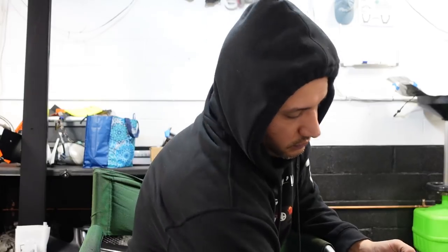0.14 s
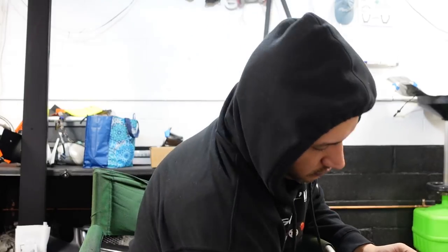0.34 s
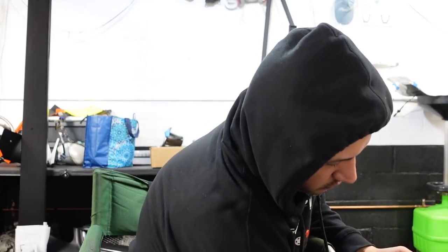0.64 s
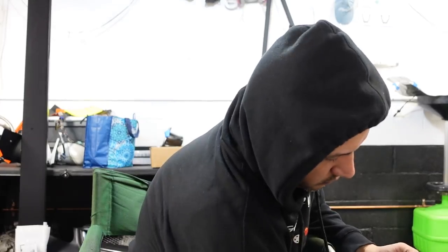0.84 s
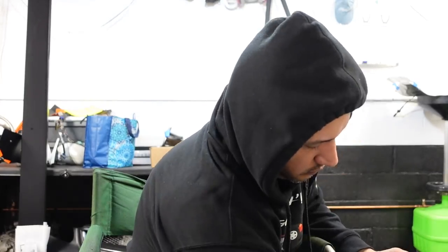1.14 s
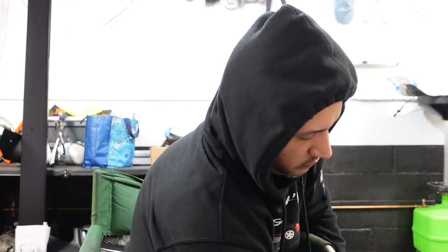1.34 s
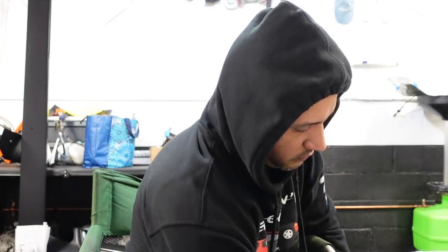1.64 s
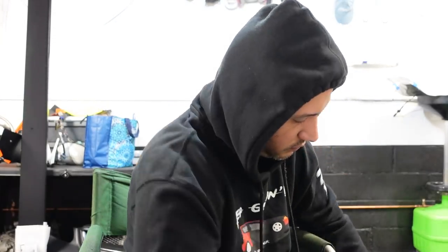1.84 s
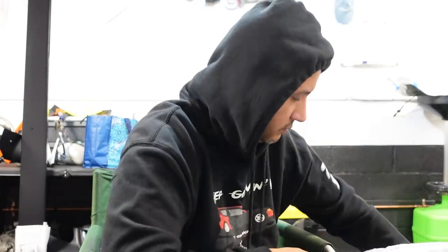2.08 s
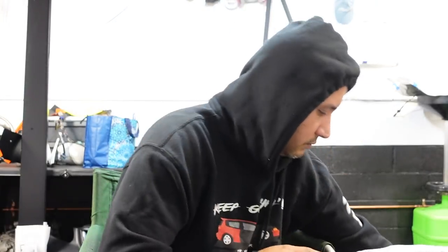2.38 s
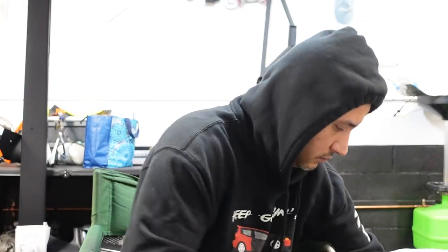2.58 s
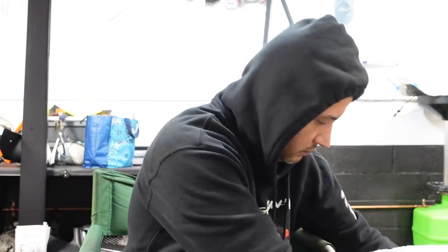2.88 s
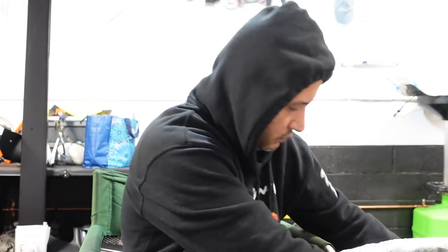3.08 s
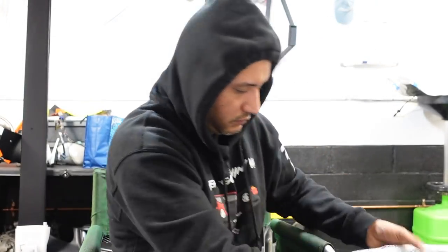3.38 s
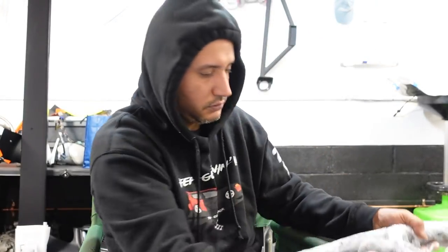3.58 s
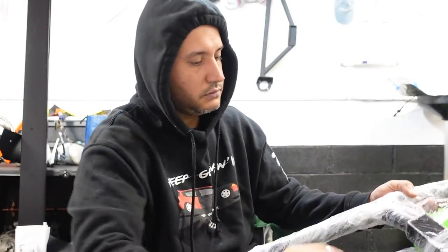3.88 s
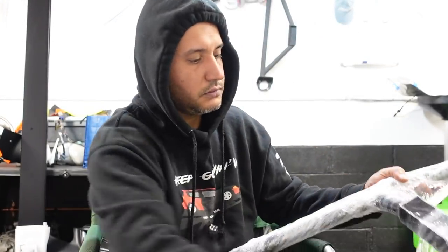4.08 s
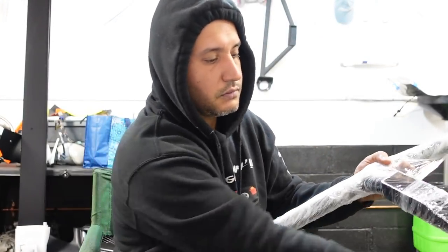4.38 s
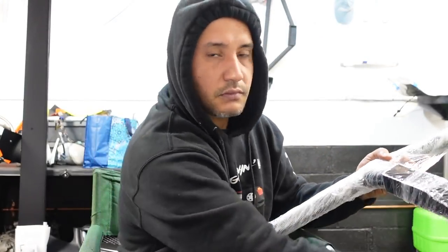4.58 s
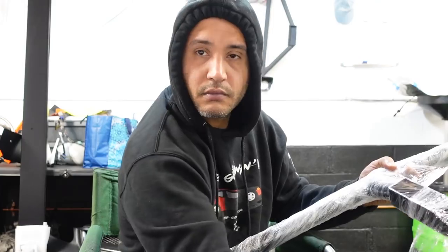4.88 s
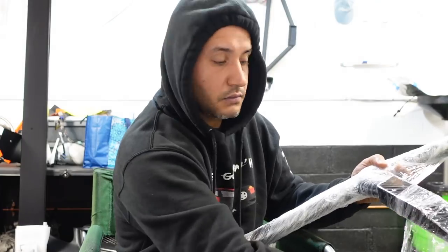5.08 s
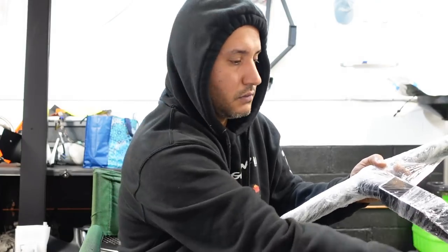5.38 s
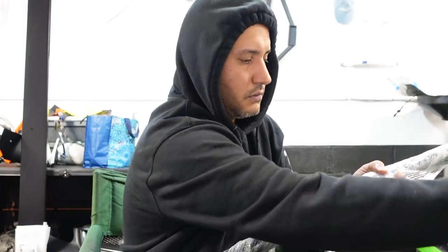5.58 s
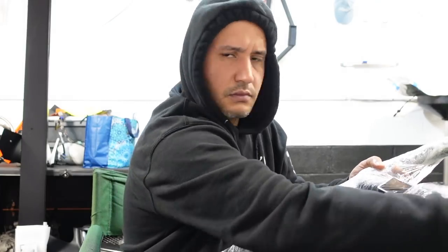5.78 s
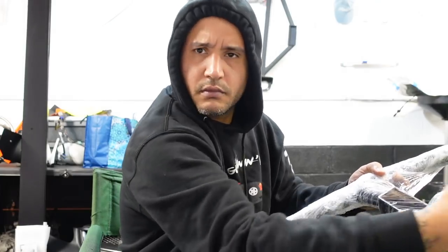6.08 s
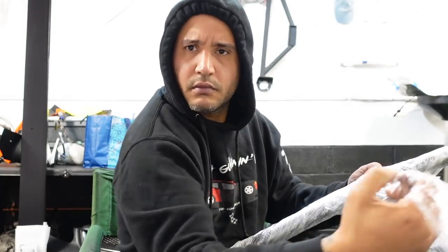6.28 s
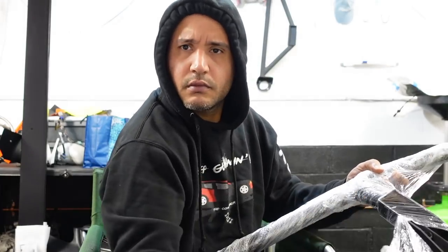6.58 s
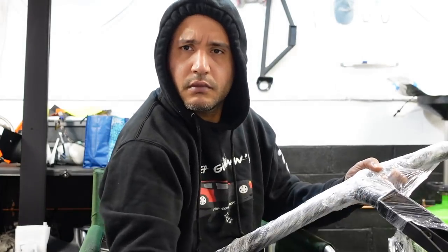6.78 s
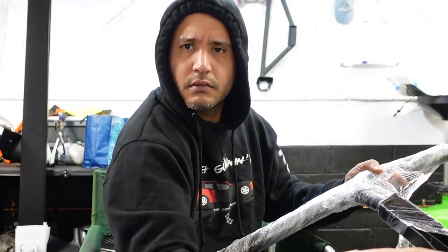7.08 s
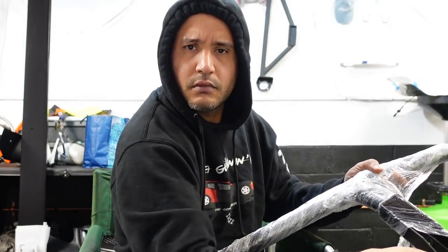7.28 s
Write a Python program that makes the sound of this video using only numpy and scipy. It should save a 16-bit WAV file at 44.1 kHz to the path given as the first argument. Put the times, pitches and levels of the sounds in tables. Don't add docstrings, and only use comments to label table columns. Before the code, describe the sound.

Hands work plastic film wrapped around metal bars, close to a stereo microphone in a hard-walled garage. Crinkling comes in uneven squeezes, quieter at first, with a cluster of snaps and small air-pocket blips just after two seconds. The loudest crackles come around four seconds and again just before six, then it thins to faint rustles and ticks over soft hiss and low hum.

```python
import sys
import numpy as np
from scipy import signal
from scipy.fft import rfft, irfft, next_fast_len
from scipy.io import wavfile
from scipy.ndimage import uniform_filter1d

SR = 44100
rng = np.random.default_rng(int(sys.argv[2]) if len(sys.argv) > 2 else 0)


def nominal_scale(level):
    x = np.asarray(level, float) / 20
    return 10 ** x


def master_out(mix):
    frames = np.transpose(np.atleast_2d(mix))
    ceiling = np.clip(frames, -1, 1)
    pcm = np.round(ceiling * 32767).astype(np.int16)
    wavfile.write(sys.argv[1], SR, pcm)


N = 328236

# (frequency [Hz], level per Hz [dB])
HISS_COLOUR = [(18, -42), (30, -49), (66, 3), (170, 9.5), (252, 7), (355, 0), (584, -1), (822, 0),
               (889, -2), (1070, -4.5), (4910, -2.5), (9970, -31), (16000, -62)]
# (time [s], level [dB])
RUMBLE_LEVEL = [(0.0, -62), (0.23, -63), (0.27, -70), (1.76, -65.5), (1.99, -58), (2.73, -81), (3.52, -69),
                (3.6, -63), (3.83, -66.5), (4.93, -74), (5.06, -62), (5.47, -72), (5.76, -64), (6.65, -72),
                (6.84, -56.5), (7.44, -66)]
# (frequency [Hz], width [Hz])
ROOM_MODES = [(50, 25), (82, 4), (205, 41)]
# (time [s], level [dB])
BENCH_LOAD = [(0, 3.5), (0.5, 3), (1.3, 4.5), (1.7, -2), (2.1, -0.5), (2.4, -6.5), (3.1, -3), (3.55, 8),
              (4.15, 4), (4.35, 1), (5.3, -8), (5.62, 4.5), (5.8, -1), (6.5, 0), (7.44, -3)]
# (peak time [s], effort [dB], rise [s], fall [s], fold size [no unit])
SQUEEZES = [(0.08, -39, 0.47, 0.2, 0.22), (0.248, -33.5, 0.16, 0.097, 0.11),
            (0.688, -27.5, 0.088, 0.13, 0.29), (0.86, -38.5, 0.17, 0.5, 0.7),
            (1.088, -36.5, 0.4, 0.35, -0.17), (1.309, -35.5, 0.11, 0.13, -0.52),
            (1.493, -39, 0.17, 0.19, -0.064), (1.7, -43.5, 0.097, 0.78, -0.71),
            (2.084, -31, 0.53, 0.22, -0.18), (2.161, -31, 0.32, 0.05, 0.93),
            (2.361, -37.5, .14, 0.34, 0.85), (2.614, -39, 0.31, 0.42, 0.2), (2.897, -43.5, 0.1, 1, -0.61),
            (3.25, -32.5, 0.087, 0.11, 0.24), (3.601, -32.5, 0.32, 0.2, 0.41),
            (3.767, -29, 0.18, 0.12, -0.098), (3.967, -33, 0.048, 0.34, .1), (4.061, -33, 0.28, 0.17, 0.25),
            (5.295, -45, 0.08, 0.78, 0.34), (5.671, -29.5, 0.19, 0.22, 0.09), (5.97, -28, 0.4, 0.048, 0.31),
            (6.311, -35, 0.34, 0.12, -0.18), (6.508, -35.5, 0.22, 0.21, -0.34),
            (6.807, -38.5, 0.23, 0.19, 0.24)]
# (time [s], effort [dB], fall [s], fold size [no unit])
TUGS = [(0.589, -45.5, 0.48, 0.74), (0.186, -40, 0.32, .4), (1.237, -43, 0.08, -0.67),
        (3.205, -35, .2, -.2), (3.15, -43.5, .3, -.4), (3.389, -37, 0.42, -.7), (3.462, -28, 0.067, -0.55),
        (3.915, -43, 0.27, -0.53), (4.241, -26.5, 0.26, -0.055), (4.328, -32.5, 0.03, -0.73),
        (4.382, -35.5, 0.2, 0.5), (4.207, -34, 0.21, 0.2), (4.47, -42.5, 0.53, 0.19),
        (4.57, -49.5, 0.45, -0.5), (4.664, -36.5, 0.11, -0.5), (4.75, -47, 0.59, -0.5),
        (4.815, -47.5, 0.36, -0.46), (5.385, -43.5, 0.25, -0.61), (2.97, -45, 0.1, -0.18),
        (4.87, -34, 0.015, -0.12), (5.494, -41, 0.55, .2), (5.804, -25.5, 0.27, .6),
        (6.128, -41.5, 0.72, -0.05), (6.621, -35.5, 0.28, -0.63), (5.215, -53.5, .5, -.3),
        (7.0, -52, 0.74, -0.64), (7.234, -49.5, .2, -1), (7.335, -49.5, 0.39, -1.6)]
# (frequency [Hz], level per Hz [dB])
FILM_COLOUR = [(82, -26), (140, -14), (296, -6.5), (375, -10.5), (690, -8), (747, -6), (808, -7),
               (1150, -4), (1300, -3), (2160, -1), (4850, 2.5), (15500, 22.5)]
FOLD_EDGES = [800, 2000, 5000]
# (delay [s], level [dB], centre frequency [Hz], blur [s])
ECHOES = [(.0073, -7, 6500, .0005), (.0165, -15, 4000, .002), (.027, -16, 4000, .003)]
# (frequency [Hz], time to fall 60 dB [s])
WALL_DECAY = [(200, 0.37), (1000, 0.39), (3000, 0.37), (7000, 0.63), (14000, 0.36)]
# (frequency [Hz], likeness [0 to 1])
LEFT_RIGHT_LIKENESS = [(60, .96), (180, .8), (550, .8), (1650, .87), (3000, .95), (5000, .93), (9000, .8),
                       (15000, .88)]
# (time [s], peak [dB], ring [Hz], flap relative to peak [dB])
LOUD_SNAPS = [(0.6479, -18.4, 2670, -5), (0.6756, -11.5, 3270, -4), (1.0216, -23, 1550, 0),
              (2.0251, -15.9, 3010, -8), (2.075, -15.5, 2540, -14), (2.1451, -15.2, 2930, -7),
              (2.3859, -17.4, 2500, -1), (3.3858, -15.5, 2150, -6), (3.4611, -14.9, 4220, -19),
              (3.5455, -16, 2450, -10), (3.6188, -14, 1510, 0), (3.7441, -13.9, 3190, -8),
              (3.7564, -9.7, 2670, -10), (3.7615, -13.1, 1940, -2), (3.9734, -8.3, 2330, -4),
              (4.0151, -11.5, 6330, -3), (4.2013, -17.5, 1850, -3), (4.2435, -10.8, 2110, -5),
              (4.2474, -11.9, 3880, -3), (4.3373, -16, 2410, -2), (4.8688, -9.5, 3570, -20),
              (5.4914, -9.6, 3360, -18), (5.5444, -15.5, 3750, -9), (5.6604, -10.7, 5860, -9),
              (5.7665, -15.9, 1550, -2), (5.7964, -9.7, 3620, -5), (5.804, -12, 4570, -18),
              (5.916, -9.1, 2540, -8), (5.9193, -10.4, 2930, -5), (5.9536, -9.6, 2020, -7)]
# (time [s], peak [dB], ring [Hz])
TICKS = [(0.1239, -25.2, 1680), (0.5882, -32.3, 1510), (0.9293, -21.7, 4570), (1.2417, -24.7, 3880),
         (1.3034, -22.1, 3530), (2.326, -21, 4090), (2.6107, -22.5, 6890), (3.3794, -23.5, 6630),
         (3.4189, -20.2, 3060), (3.8978, -23.2, 4050), (4.1621, -23.4, 3570), (4.4514, -20.7, 3400),
         (4.6606, -21.2, 2280), (4.861, -24.9, 3790), (5.0168, -33.2, 3140), (5.0776, -27, 3570),
         (5.3887, -27.3, 1810), (6.2858, -19.6, 2500), (6.4337, -20, 5210), (6.6191, -22.7, 1850),
         (6.6369, -21.7, 6370), (6.6931, -21.9, 2370), (6.745, -22, 2500), (7.1221, -34.1, 3570),
         (7.1853, -36.3, 3880), (7.2315, -35.1, 2760), (7.2742, -32.1, 2840), (7.3315, -25.5, 3960),
         (7.3726, -33.4, 3400), (7.379, -30.7, 6330)]
# (time [s],
# peak [dB], pitch [Hz])
POCKETS = [(2.288, -34, 1320), (2.312, -31, 1140), (2.328, -22.5, 1250), (2.335, -25, 1300),
           (2.342, -38, 1190), (2.364, -38, 1250), (2.375, -32, 1070), (2.383, -23.5, 1130),
           (2.414, -24.5, 1300), (2.421, -24, 1620), (2.43, -28, 1310), (2.488, -37, 1110),
           (2.509, -30, 1620), (2.54, -38, 910), (2.601, -30.5, 1100), (2.63, -31.5, 1210),
           (2.747, -34, 1350), (2.968, -37.5, 1340), (2.986, -43, 1450), (3.457, -17, 4670),
           (3.468, -21, 4300), (3.479, -18, 4800), (5.895, -14.5, 1400), (5.909, -18, 1280),
           (5.942, -26, 1520), (3.618, -26, 856), (3.619, -24, 1070), (4.868, -30, 994), (5.492, -32, 1040),
           (3.222, -35.5, 300)]
# (frequency [Hz], level [dB], time to fall 60 dB [s])
BAR_MODES = [(800, -4, .3), (900, -3, .3), (974, -1, .3), (1060, -3, .3), (1141, -2, .3), (1287, -2, .3)]
# (frequency [Hz], left minus right [dB])
LEFT_RIGHT_LEAN = [(60, -.5), (200, -1), (700, -1.7), (1400, -1.8), (2800, -1), (5600, -2.4), (11000, -.9),
                   (15000, .2)]


def evened(x):
    return x / np.sqrt(np.mean(x ** 2) + 1e-20)


def read(points, hz):
    f, value = np.transpose(points)
    return np.interp(np.log(hz + 1), np.log(f + 1), value)


def curve(table):
    s, *columns = np.transpose(table)
    t = np.arange(N) / SR
    return [np.interp(t, s, column) for column in columns]


def shaped(x, gain):
    size = next_fast_len(x.shape[-1])
    spectrum = rfft(x, size) * gain(np.fft.rfftfreq(size, 1 / SR))
    return irfft(spectrum, size)[..., :x.shape[-1]]


def paired(a, b):
    def likeness(hz):
        return np.clip(read(LEFT_RIGHT_LIKENESS, hz), 0, .999)
    mid = shaped(a, lambda hz: np.sqrt((1 + likeness(hz)) / 2))
    side = shaped(b, lambda hz: np.sqrt((1 - likeness(hz)) / 2))
    return np.array([mid + side, mid - side])


def ring(hz, cycles, size=400):
    turns = np.arange(size) / SR * hz
    swell = 1 - np.exp(-turns * 6)
    return np.sin(2 * np.pi * turns) * swell * np.exp(-turns / cycles)


def handling():
    rise_bend, tug_rise_s, idle_db = 1.6, .007, -67.5
    t = np.arange(0, N / SR + .002, .001)
    tugs = [(s, db, tug_rise_s, fall, fold) for s, db, fall, fold in TUGS]
    s, db, rise, fall, fold = np.transpose([*SQUEEZES, *tugs])[:, :, None]
    below_peak = np.where(t < s, abs((s - t) / rise) ** rise_bend, (t - s) / fall)
    power = nominal_scale(db - 20 * below_peak) ** 2
    total = power.sum(0) + nominal_scale(idle_db) ** 2
    mean_fold = (power * fold).sum(0) / total
    return curve(np.transpose([t, 10 * np.log10(total), mean_fold]))


def air(effort_db):
    hiss_db, low_mode_db, murmur_db, murmur_share = -56, -5.5, -66.5, 0.45
    a, b, *drives = rng.standard_normal((2 + len(ROOM_MODES), N))
    hiss = evened(shaped(paired(a, b), lambda hz: nominal_scale(read(HISS_COLOUR, hz))))
    rumble_db = curve(RUMBLE_LEVEL)[0]
    weight_db = uniform_filter1d(effort_db, 6000) + 39
    murmur_level_db = murmur_db + murmur_share * weight_db + curve(BENCH_LOAD)[0]
    levels_db = rumble_db + low_mode_db, rumble_db, murmur_level_db
    out = nominal_scale(hiss_db) * hiss
    for drive, (centre, width), level_db in zip(drives, ROOM_MODES, levels_db):
        mode = shaped(drive, lambda hz: 1 / (1 + (2 * (hz - centre) / width) ** 2))
        out = out + nominal_scale(level_db) * evened(mode)
    return out


def crumple(effort_db, fold, count=24):
    grain_db = 2.3
    per_s = np.clip(2500 * nominal_scale(.5 * (effort_db + 42.5)), 300, 12000)
    clump = nominal_scale(2.5 * evened(uniform_filter1d(rng.standard_normal(N), 500)))
    struck = rng.random(N) < per_s * clump / SR
    patch = rng.integers(0, count, N)
    size = nominal_scale(grain_db * np.minimum(rng.exponential(1, N), 3.6))
    flicks = size * rng.choice([-1., 1.], N) * struck / np.sqrt(per_s)
    swarm = np.zeros(N)
    for k, patch_hz in enumerate(np.geomspace(400, 13000, count)):
        swarm += signal.oaconvolve(flicks * (patch == k), evened(ring(patch_hz, 0.75)))[:N]

    rub = rng.standard_normal(N) * np.sqrt(clump)
    rub = shaped(rub, lambda f: nominal_scale(np.interp(f, [6000, 12000], [-5, 3])))

    hz, power = signal.welch(swarm, SR, nperseg=512)
    flat = evened(shaped(swarm, lambda f: np.interp(f, hz, power + 1e-9 * power.max()) ** -.5))
    film = shaped(flat + rub, lambda f: nominal_scale(read(FILM_COLOUR, f)))

    below = [shaped(film, lambda f: 1 / (1 + (f / edge) ** 4)) for edge in FOLD_EDGES]
    bands = np.diff([0 * film] + below + [film], axis=0)
    slack, broad, middle, fine = map(evened, bands)
    slack_db = -17.5 + 12.5 * fold + curve(BENCH_LOAD)[0]
    broad_db = -8.1 + 11 * fold
    fine_db = -14 - 0.55 * fold
    mix = middle + nominal_scale(broad_db) * broad + nominal_scale(slack_db) * slack + nominal_scale(fine_db) * fine
    return nominal_scale(effort_db - 3) * mix


def garage(x, count=3):
    out, t = np.zeros((2, N)), np.arange(N) / SR
    for k in range(count):
        early = np.zeros((2, 2000))
        for delay, db, centre_hz, blur in ECHOES:
            spread = np.exp(-abs(np.arange(2000) / SR - delay) / blur)
            burst = paired(*(rng.standard_normal((2, 2000)) * spread))
            burst = shaped(burst, lambda hz: 1 / (1 + np.log((hz + 1) / centre_hz) ** 2 * 3))
            early += nominal_scale(db) * burst / np.linalg.norm(burst[0])

        taps = np.zeros((2, SR))
        at = np.arange(300, SR - 20, 20) + rng.integers(0, 20, (2, (SR - 301) // 20))
        np.put_along_axis(taps, at, rng.choice([-1., 1.], at.shape), 1)
        hz, frames, z = signal.stft(taps, SR, nperseg=256)
        dying = z * nominal_scale(-60 * frames / read(WALL_DECAY, hz)[:, None])
        tail = paired(*signal.istft(dying, SR, nperseg=256)[1])
        tail = nominal_scale(-4.5) * tail / np.linalg.norm(tail[0])
        tail[:, :2000] += early

        share = np.sqrt(2 / count) * np.cos(np.pi * (11.5 * t + k / count))
        out += signal.fftconvolve((x * share)[None], tail, axes=1)[:, :N]
    return out


def snaps(effort_db, count=50):
    tick_flap_db, stray_over_db, stray_from_db = -24, 11, -46
    out, t = np.zeros(N + 400), np.arange(400) / SR
    stray = []
    for place, a, b in rng.random((count, 3)):
        at = int(100 + place * (N - 200))
        resting = effort_db[at] < stray_from_db
        peak_db = effort_db[at] + stray_over_db + 3.7 * a - 40 * resting
        stray.append((at / SR, peak_db, 1800 * 4.2 ** b))
    rows = [*LOUD_SNAPS, *((*row, tick_flap_db) for row in [*TICKS, *stray])]
    band = signal.butter(3, [700, 9000], "band", fs=SR)
    for s, peak_db, hz, flap_db in rows:
        low, *splinter = rng.standard_normal(401)
        flap = nominal_scale(flap_db - 2.5) * ring(1050 + 100 * low, 0.95)
        burst = nominal_scale(-1) * np.diff(splinter, prepend=0) * np.exp(-t / .001)
        tone = 2 * ring(hz, 1.2) + ring(1.65 * hz, 1.2)
        crack = signal.lfilter(*band, tone + burst + flap)
        out[round(s * SR) - 8:][:400] += nominal_scale(peak_db) * crack / abs(crack).max()
    return out[:N]


def pockets():
    out = np.zeros(N)
    for s, peak_db, hz in POCKETS:
        out[round(s * SR):][:2000] += nominal_scale(peak_db + 1) * ring(hz, 3.6, size=2000)
    return out


def bar(x):
    t = np.arange(SR // 2) / SR
    modes = sum(nominal_scale(db - 60 * t / t60) * np.sin(2 * np.pi * hz * t) for hz, db, t60 in BAR_MODES)
    return nominal_scale(-53) * signal.fftconvolve(x, modes)[:N]


def scene():
    effort_db, fold = handling()
    hollow = pockets()
    film = crumple(effort_db, fold) + snaps(effort_db) + hollow + bar(hollow)
    return film + garage(film) + air(effort_db)


def top_cut(x):
    return signal.sosfilt(signal.butter(12, 16470, fs=SR, output="sos"), x)


def record(dry):
    def tone(hz):
        bass_cut = 1 / (1 + (42 / (hz + 1)) ** 6)
        treble_edge = 1 / (1 + (hz / 15800) ** 400)
        dull = nominal_scale(np.interp(hz, [8500, 14500], [0, -5]))
        lean = nominal_scale(np.outer([.5, -.5], read(LEFT_RIGHT_LEAN, hz)))
        return bass_cut * treble_edge * dull * lean
    return top_cut(shaped(dry, tone))


dry = scene()
out = record(dry)
master_out(out)
```